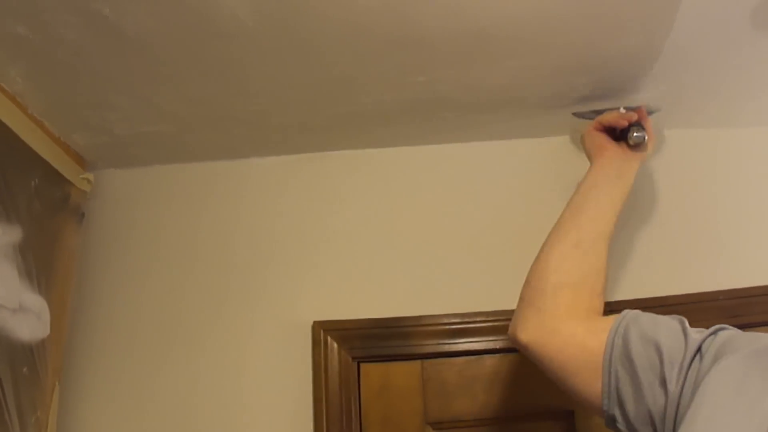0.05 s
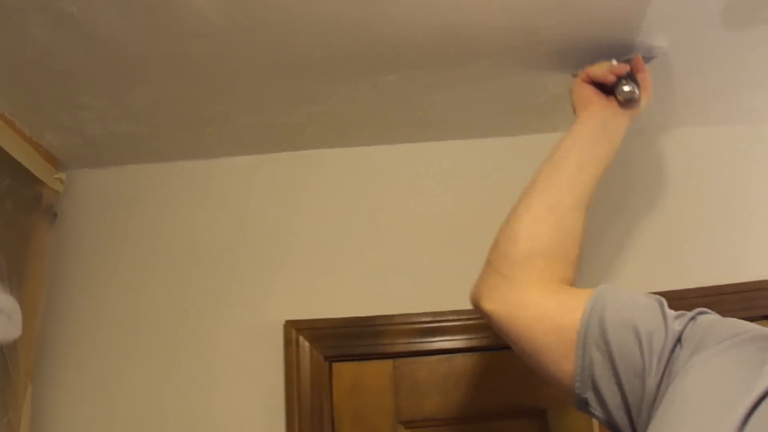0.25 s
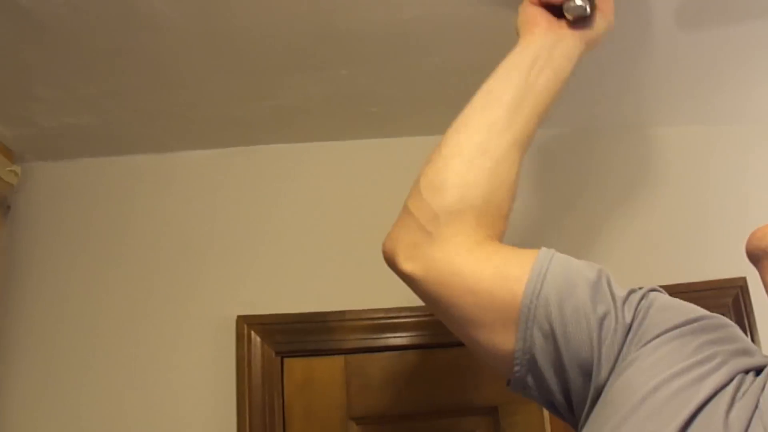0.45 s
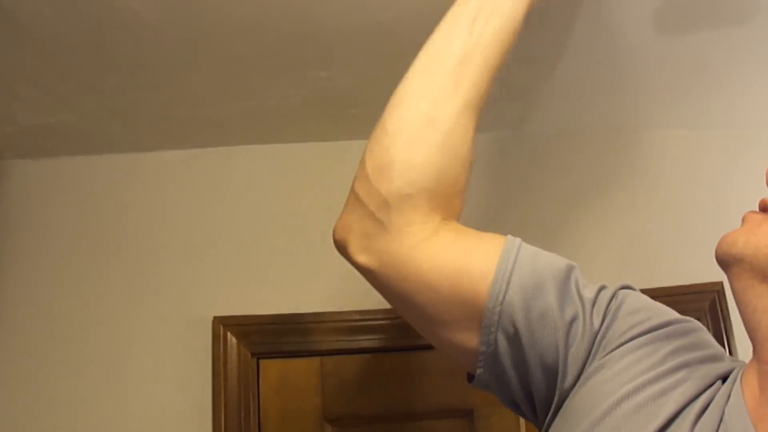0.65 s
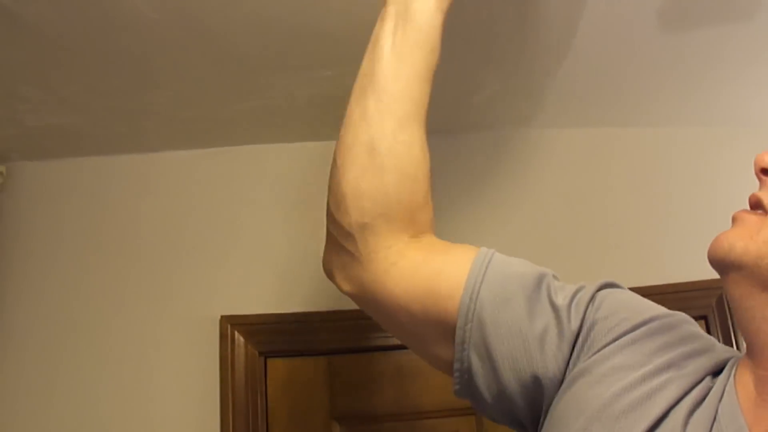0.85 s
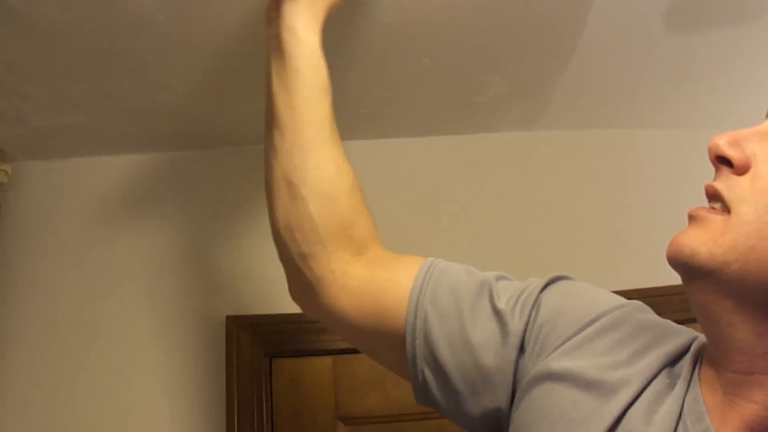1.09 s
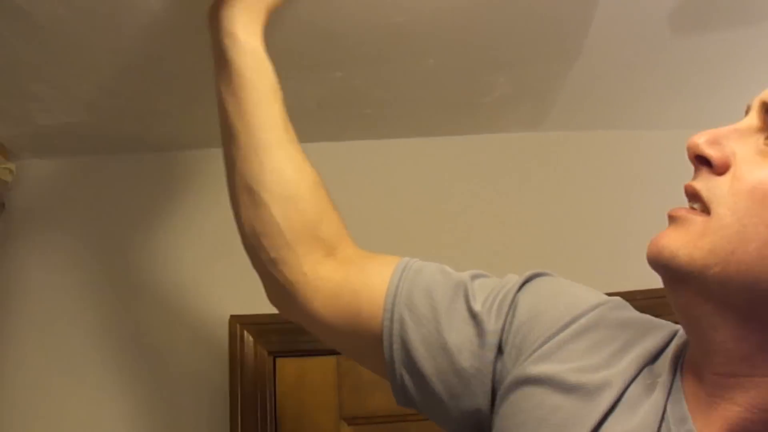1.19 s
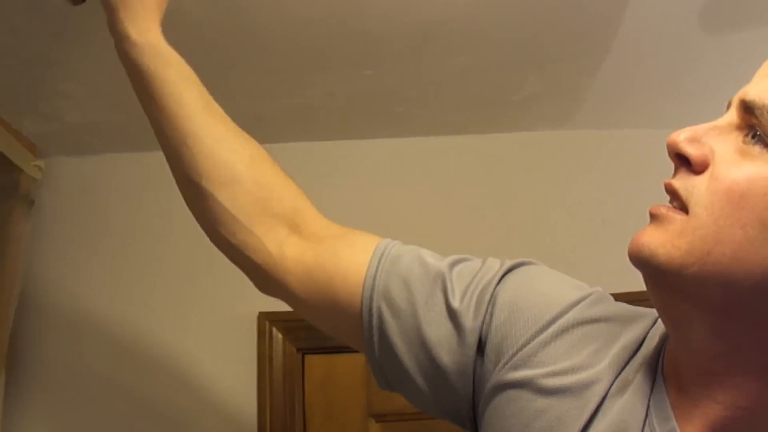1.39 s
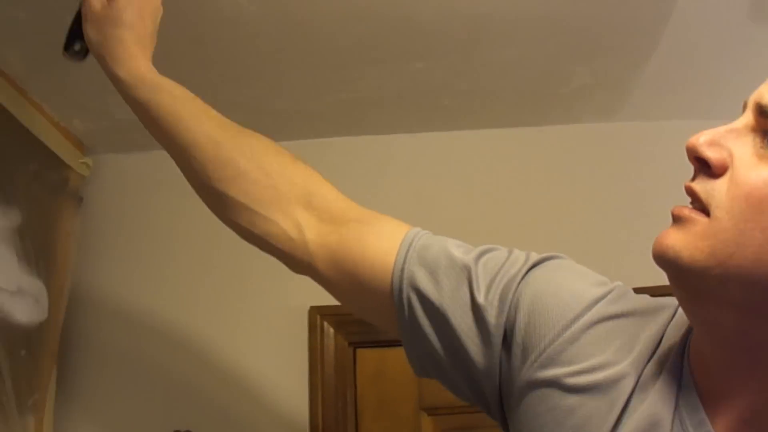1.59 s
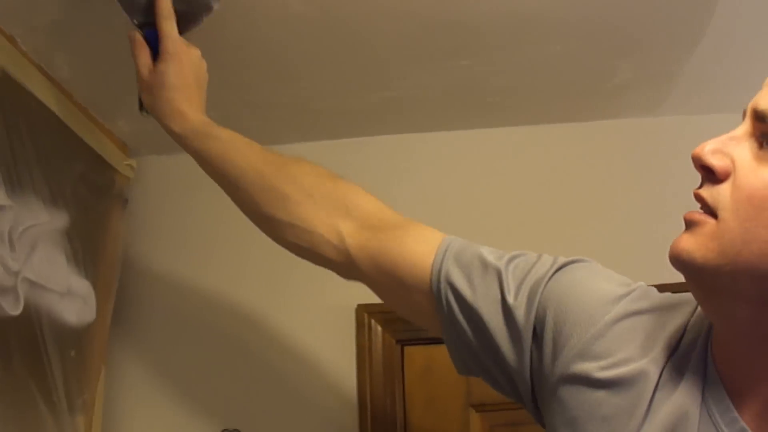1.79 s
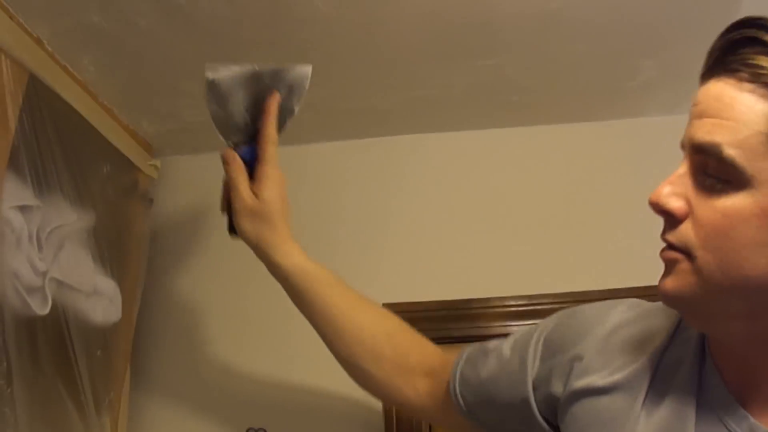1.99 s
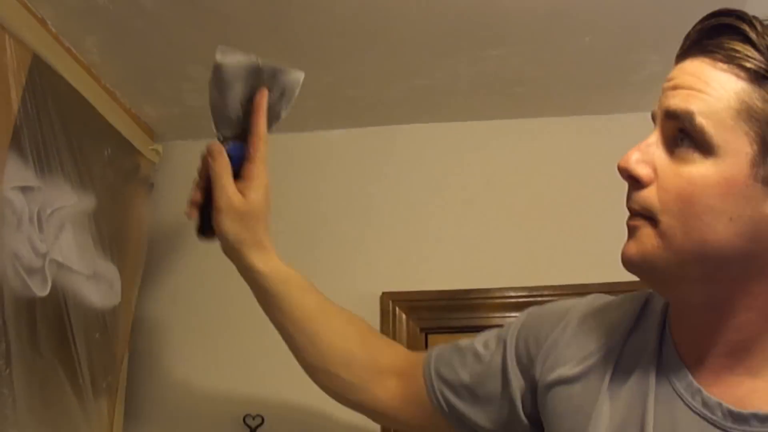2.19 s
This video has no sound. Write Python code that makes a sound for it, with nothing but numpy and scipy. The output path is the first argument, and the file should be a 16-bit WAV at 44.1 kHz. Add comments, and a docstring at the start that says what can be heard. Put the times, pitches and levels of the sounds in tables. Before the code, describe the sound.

A steel drywall knife lands softly on a plastered ceiling, slaps flat, then scrapes in one long gritty stroke before lifting away; faint knocks, small quiet room, close phone-type microphone with slightly rough treble.

```python
"""A soft landing, a flat slap, then one long gritty stroke: a steel drywall knife on a plastered ceiling.
Grit breaking under the edge rings the blade and drums the ceiling board; both are coloured random
grains plus ringing modes. The blade lifts off amid faint knocks and lands again at the very end.
Small quiet room; a phone-type recorder sampling at half rate mirrors its treble."""
import sys
import numpy as np
from scipy import signal
from scipy.fft import rfft, irfft
from scipy.io import wavfile

SR = 44100
rng = np.random.default_rng(int(sys.argv[2]) if len(sys.argv) > 2 else 0)


def gain_from_db(level_db):
    """Convert decibel levels to linear amplitude factors (20 dB per decade)."""
    decades = np.asarray(level_db, float) / 20
    return 10 ** decades


def transcribe(u):
    """Save the signal u as a 16-bit wav file named by the first command-line argument.

    u: samples, shape (n,) or (channels, n), limited to [-1, 1]; the rate is SR.
    q: integer samples, one column per channel.
    """
    v = np.clip(np.atleast_2d(u).T, -1, 1)
    q = np.round(v * 32767).astype(np.int16)
    wavfile.write(sys.argv[1], SR, q)


N = 99225

# Blade loudness along the stroke. Each row: time in seconds, lower blade level in dB,
# upper blade level in dB, grit treble level in dB.
STROKE_LEVELS = [(0.236, -22, -24, -33), (0.274, -25, -25, -33), (0.324, -17, -19, -26),
                 (0.344, -25, -21, -27), (0.434, -22, -22, -27), (0.51, -24, -21, -30),
                 (0.514, -21, -20, -29), (0.61, -23, -24, -33), (0.664, -23, -24, -29),
                 (0.69, -22, -20, -32), (0.724, -27, -28, -37), (0.8, -25, -27, -32), (1.21, -26, -25, -31),
                 (1.214, -29, -24, -31), (1.33, -23, -21, -29), (1.35, -25, -25, -30),
                 (1.374, -31, -23, -28), (1.384, -22, -25, -30), (1.41, -27, -25, -30),
                 (1.474, -25, -21, -29), (1.53, -27, -25, -29), (1.54, -28, -19, -28),
                 (1.604, -22, -25, -30), (1.634, -26, -24, -32), (1.744, -24, -22, -28),
                 (1.794, -30, -31, -36), (1.82, -26, -33, -39), (1.86, -27, -27, -33),
                 (1.974, -46, -49, -56), (2.03, -58, -71, -69)]
# How hard board and blade body are drummed. Each row: time in seconds, hollow board note level in dB,
# low board thud level in dB, lowest blade modes level in dB.
DRUMMING_LEVELS = [(0.236, -22.5, -38, -23), (0.264, -39.5, -35, -26), (0.314, -30, -40, -25),
                   (0.35, -42, -50, -31.5), (0.42, -39, -48, -38.5), (0.48, -45, -54, -33.5),
                   (0.604, -38, -46.5, -31), (0.66, -51, -48.5, -40), (0.714, -40.5, -50, -42.5),
                   (0.92, -47.5, -50, -41.5), (0.95, -25.5, -40.5, -34), (0.99, -45, -48.5, -42.5),
                   (1.07, -42, -52, -44), (1.104, -35.5, -53.5, -38), (1.254, -49.5, -55, -44),
                   (1.28, -47, -53, -45), (1.314, -43.5, -57, -35.5), (1.44, -43, -52.5, -42),
                   (1.48, -48, -64, -39), (1.59, -55, -57.5, -38), (1.71, -43.5, -61, -42.5),
                   (1.784, -29, -45, -34.5), (1.894, -44, -45.5, -40), (1.924, -31.5, -46.5, -37),
                   (1.97, -40.5, -53, -49.5), (2.03, -66, -78, -70)]
# Broad spectrum of the blade. Each row: frequency in Hz, relative density in dB.
BLADE_SPECTRUM = [(350, -61), (600, 0), (669, 3), (711, -6), (756, -10), (823, 4.5), (1010, 2.5), (1440, 4),
                  (1750, 4), (1930, 0.5), (2430, 0), (5990, -16), (9160, -31.5), (11000, -49), (14300, -68),
                  (22000, -120)]
# Broad spectrum of the board. Each row: frequency in Hz, relative density in dB.
BOARD_SPECTRUM = [(41, -60), (70, -26), (96, -23), (161, -21), (307, -3), (359, 0.5), (426, -13),
                  (498, 10.5), (620, -2.5), (810, -49), (1360, -120)]
# Blade modes. Each row: frequency in Hz, relative level in dB, undamped t60 in seconds.
BLADE_MODES = [(720, -7, .1), (960, -4, .07), (1227, -2, .08), (1410, 0, .08), (1494, -1, .07),
               (1782, -2, .07), (2040, -3, .05), (2200, -3, .06), (2410, 0, .06), (2566, -2, .05),
               (2826, -3, .07), (3100, -6, .04), (3517, -6, .07), (4500, -11, .04)]
# Ceiling board modes. Each row: frequency in Hz, relative level in dB, undamped t60 in seconds.
BOARD_MODES = [(169, -17, .1), (260, -12, .1), (370, -10, .08), (505, 0, .12)]
# Quick touches as the blade slaps flat. Each row: time in seconds, relative strength in dB.
SLAP_TOUCHES = [(.2075, -30), (.2219, -12), (.2236, -15), (.2257, -14), (.2270, -17), (.2291, -17)]
# Small soft knocks in the quiet. Each row: start in seconds, level before the swell in dB,
# frequency in Hz, t60 in seconds.
SOFT_KNOCKS = [(.035, -45, 1456, .08), (.056, -44, 1390, .06), (.062, -42, 584, .04),
               (.073, -49, 1430, 0.036), (.112, -47, 1450, 0.061), (0.13, -35, 3160, .015),
               (.148, -35, 330, 0.039), (2.149, -32, 670, 0.046), (2.163, -34, 747, 0.034),
               (2.192, -44, 690, .04), (2.219, -39, 5500, .006)]
# Spectrum of the background hush. Each row: frequency in Hz, relative density in dB.
HUSH_SPECTRUM = [(12, -48), (20, -27), (134, -13), (295, -4.5), (463, -5), (619, 0.5), (995, -7),
                 (1370, -5.5), (5540, -18), (11000, -32), (14300, -43), (22000, -120)]

LAND_S, LAND_ATTACK_S, SLAP_S, LIFT_S = .2068, .0012, .2216, 2.05
FIRST_TOUCH_DB = -9  # from landing to slap, relative to the stroke
NEXT_LAND_S, NEXT_ATTACK_S = 2.243, .006
NEXT_BLADE_DB, NEXT_TREBLE_DB, NEXT_BOARD_DB = -32, -37, -52
GRIT_PER_S, GRIT_SPREAD_DB = 5000, 2.5
PATCHY_DB, MODE_WANDER_DB = 1.2, 4.5  # rms
BLADE_RING_DB, BOARD_RING_DB = -4.5, 2  # modes relative to the broad colour
BLADE_LOW_EDGE_HZ, BLADE_BODY_EDGE_HZ, BLADE_SPLIT_HZ, TREBLE_EDGE_HZ = 620, 900, 1900, 3600
BOARD_SPLIT_HZ = 420
SLAP_T60_FACTOR, SLAP_BOARD_DB, SLAP_TILT_DB_PER_OCTAVE = .1, -5, -3
SLAP_CRACK_DB, SLAP_CRACK_S, SLAP_SOFT_HZ = 3, .001, 4500
BASS_LOSS_HZ = 125
ROOM_T60_S, ROOM_DB, WALL_CUT_HZ = .2, -19, 3500
HUSH_DB, HUSH_PATCHY_DB = -50, 2.5
MIRROR_DB, MIRROR_RISE_HZ, CUTOFF_HZ = -7, 12600, 15740


def rms_one(x):
    """Scale to unit rms."""
    return x / np.sqrt(np.mean(x ** 2) + 1e-20)


def filtered(design, x):
    """Run second-order sections over a sound."""
    return signal.sosfilt(design, x)


def butter(order, hz, kind):
    """Butterworth filter as second-order sections."""
    return signal.butter(order, hz, kind, fs=SR, output="sos")


def drift(rate_hz):
    """Slow chance of rms 1: noise through two equal one-pole low-passes, made at SR / 40."""
    pole = np.exp(-80 * np.pi * rate_hz / SR)
    noise = rng.standard_normal(N // 40 + 2002)
    slow = signal.lfilter([1], [1, -2 * pole, pole * pole], noise)[2000:]  # settled part
    return np.interp(np.arange(N) / 40, np.arange(len(slow)), rms_one(slow - slow.mean()))


def ring(clicks, hz, t60_s):
    """A two-pole resonator: a unit click sets off a decaying sine of starting height 1."""
    radius, angle = gain_from_db(-60 / (t60_s * SR)), 2 * np.pi * hz / SR
    feedback = [1, -2 * radius * np.cos(angle), radius * radius]
    return signal.lfilter([0, np.sin(angle)], feedback, clicks + 1e-18)


def split(x, hz):
    """Lower and upper part by complementary spectral shares, each then scaled to rms 1."""
    spectrum = rfft(x)
    bin_hz = np.arange(len(spectrum)) * SR / len(x)
    low_share = 1 / (1 + (bin_hz / hz) ** 12)
    return [rms_one(irfft(spectrum * share, len(x))) for share in (low_share, 1 - low_share)]


def coloured(sources, spectrum, patchy_db):
    """Third-octave bands taken in turn from two sources, each with its own level and flicker; rms 1."""
    hz, db = np.transpose(spectrum)
    edges = hz[0] * 2 ** np.arange(0, np.log2(hz[-1] / hz[0]) + .01, 1 / 3)
    out = 0
    for k, (low, high) in enumerate(zip(edges, edges[1:])):
        band = filtered(butter(2, [low, high], "band"), sources[k % 2])
        level_db = np.interp(np.log(low * high) / 2, np.log(hz), db)
        out = out + band * gain_from_db(level_db + patchy_db * drift(10.2))
    return rms_one(out)


def grit():
    """Two trains of plaster grains breaking at random, a few much bigger than the rest."""
    sizes = gain_from_db(GRIT_SPREAD_DB * np.minimum(rng.exponential(1, (2, N)), 5))
    signs = rng.choice([-1, 1], (2, N))
    breaking = rng.random((2, N)) < GRIT_PER_S / SR
    return sizes * signs * breaking


def driven(grains, modes):
    """Grains ring each mode; how strongly each is fed wanders slowly at random; rms 1."""
    out = np.zeros(N)
    for k, (hz, db, t60_s) in enumerate(modes):
        fed = grains[k % 2] * gain_from_db(MODE_WANDER_DB * drift(8.5))
        out += gain_from_db(db) * rms_one(ring(fed, hz, t60_s))
    return rms_one(out)


def contact(rows, column, next_db):
    """Gain of a layer: silent, light touch, stroke after the slap, lift-off, next landing."""
    t, rows = np.arange(N) / SR, np.array(rows)
    db = np.interp(t, rows[:, 0], rows[:, column]) + FIRST_TOUCH_DB * (t < SLAP_S)
    first = np.clip((t - LAND_S) / LAND_ATTACK_S, 0, 1) * (t < LIFT_S) * gain_from_db(db)
    landing = np.clip((t - NEXT_LAND_S) / NEXT_ATTACK_S, 0, 1)
    return first + gain_from_db(next_db) * landing


def scrape():
    """Breaking grit excites blade and board; each frequency part follows its own contact gain."""
    grains = grit()
    blade = coloured(grains, BLADE_SPECTRUM, PATCHY_DB) + gain_from_db(BLADE_RING_DB) * driven(grit(), BLADE_MODES)
    board = coloured(grains, BOARD_SPECTRUM, PATCHY_DB) + gain_from_db(BOARD_RING_DB) * driven(grit(), BOARD_MODES)

    lower, upper = split(blade, BLADE_SPLIT_HZ)
    lower = split(lower, BLADE_LOW_EDGE_HZ)[1]
    body, lower = split(lower, BLADE_BODY_EDGE_HZ)
    upper, treble = split(upper, TREBLE_EDGE_HZ)
    thud, hollow = split(board, BOARD_SPLIT_HZ)
    hollow = split(hollow, BLADE_LOW_EDGE_HZ)[0]

    out = lower * contact(STROKE_LEVELS, column=1, next_db=NEXT_BLADE_DB)
    out += upper * contact(STROKE_LEVELS, column=2, next_db=NEXT_BLADE_DB)
    out += treble * contact(STROKE_LEVELS, column=3, next_db=NEXT_TREBLE_DB)
    out += hollow * contact(DRUMMING_LEVELS, column=1, next_db=NEXT_BOARD_DB)
    out += thud * contact(DRUMMING_LEVELS, column=2, next_db=NEXT_BOARD_DB)
    out += body * contact(DRUMMING_LEVELS, column=3, next_db=NEXT_BOARD_DB)
    return out


def slaps():
    """Each touch strikes blade and board modes, damped by the hand, with a short noise crack."""
    touch_s, touch_db = np.transpose(SLAP_TOUCHES)
    at = (touch_s * SR).astype(int)
    board = [(hz, db + SLAP_BOARD_DB, t60_s) for hz, db, t60_s in BOARD_MODES]
    ringing = np.zeros(N)
    for hz, mode_db, t60_s in list(BLADE_MODES) + board:
        tilt_db = SLAP_TILT_DB_PER_OCTAVE * max(np.log2(hz / 1000), 0)
        scatter_db = rng.normal(0, 2.5, len(at))
        clicks = np.zeros(N)
        clicks[at] = gain_from_db(touch_db + mode_db + tilt_db + scatter_db) * rng.choice([-1, 1], len(at))
        ringing += ring(clicks, hz, t60_s * SLAP_T60_FACTOR)
    clicks = np.zeros(N)
    clicks[at] = gain_from_db(touch_db + SLAP_CRACK_DB)
    decay = signal.lfilter([1], [1, -np.exp(-1 / (SLAP_CRACK_S * SR))], clicks)
    crack = decay * rng.standard_normal(N)
    return filtered(butter(3, [250, SLAP_SOFT_HZ], "band"), ringing + crack)


def knocks():
    """Faint soft knocks: sines, each swelling briefly and dying."""
    out = np.zeros(N)
    for start_s, db, hz, t60_s in SOFT_KNOCKS:
        t = np.maximum(np.arange(N) / SR - start_s, 0)
        swell = 1 - np.exp(-t / (.1 * t60_s))
        out += gain_from_db(db - 60 * t / t60_s) * swell * np.sin(2 * np.pi * hz * t)
    return out


def room(x):
    """Ten feedback delays of 12 to 40 ms, duller on every round; echoes only."""
    out, dull = np.zeros(N), np.exp(-2 * np.pi * WALL_CUT_HZ / SR)
    for k, lag in enumerate((rng.uniform(.012, .04, 10) * SR).astype(int)):
        loop, state = x.copy(), [0.]
        gain = gain_from_db(-60 * lag / SR / ROOM_T60_S)
        for i in range(lag, N, lag):
            back, state = signal.lfilter([gain * (1 - dull)], [1, -dull], loop[i - lag:i], zi=state)
            loop[i:i + lag] += back[:N - i]
        out += (loop - x) * (-1) ** k
    return out


def hush():
    """Steady background: noise coloured in bands that flicker slightly."""
    return gain_from_db(HUSH_DB) * coloured(rng.standard_normal((2, N)), HUSH_SPECTRUM, HUSH_PATCHY_DB)


def scene():
    """Knife and knocks, room and hush; a thin blade radiates no deep bass."""
    knife = filtered(butter(4, BASS_LOSS_HZ, "high"), scrape() + slaps() + knocks())
    return (knife + gain_from_db(ROOM_DB) * room(knife) + hush())[None]


def roll_off(x):
    """The treble ends steeply here."""
    return signal.sosfilt(signal.butter(12, 16840, fs=SR, output="sos"), x)


def record(dry):
    """Sampled at half rate; doubling the rate leaves a weak mirror of the treble above the fold."""
    x = filtered(signal.ellip(10, .5, 50, SR / 4, fs=SR, output="sos"), dry)
    folded = x * (-1) ** np.arange(N)  # sign flips reverse the spectrum about SR / 4
    mirror = filtered(butter(1, MIRROR_RISE_HZ, "high"), folded)
    low_pass = signal.ellip(14, .5, 70, CUTOFF_HZ, fs=SR, output="sos")
    mix = filtered(low_pass, x + gain_from_db(MIRROR_DB) * mirror)
    return roll_off(mix)


dry = scene()
out = record(dry)
transcribe(out)
```